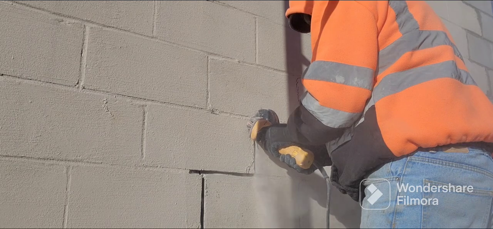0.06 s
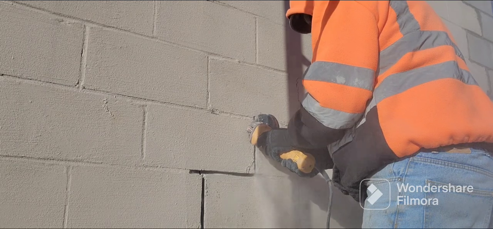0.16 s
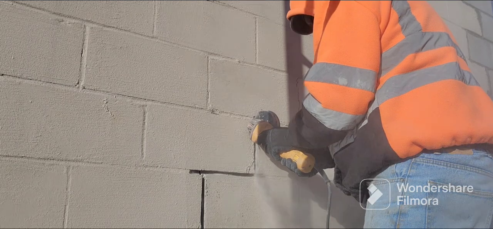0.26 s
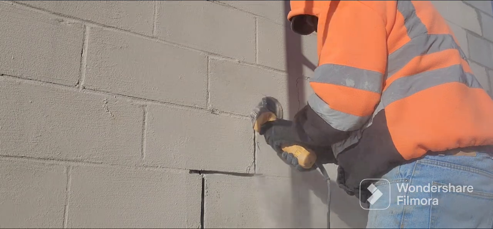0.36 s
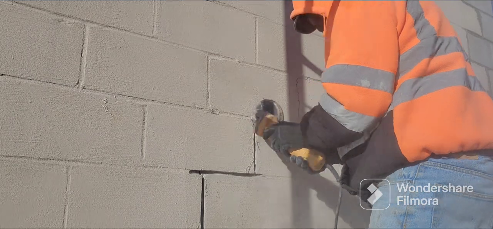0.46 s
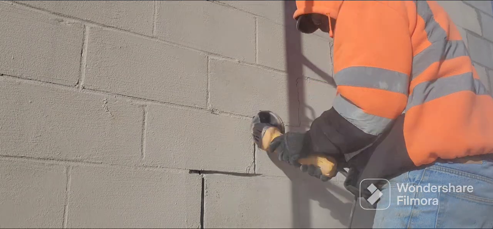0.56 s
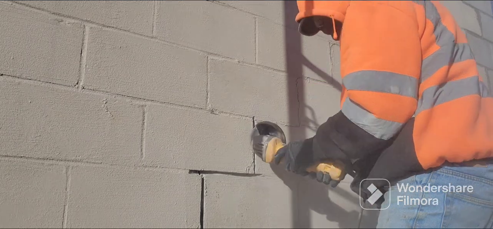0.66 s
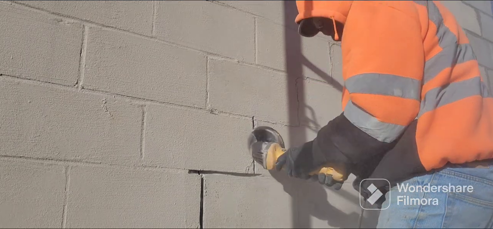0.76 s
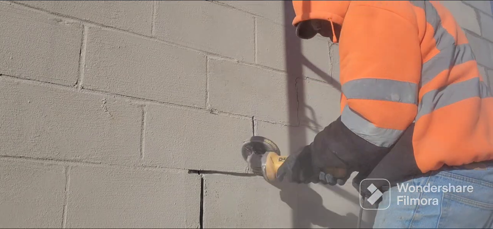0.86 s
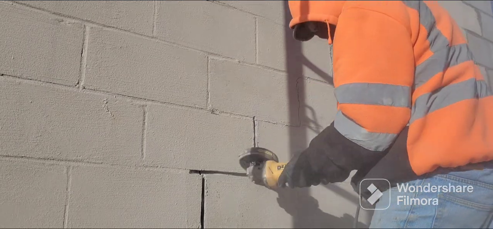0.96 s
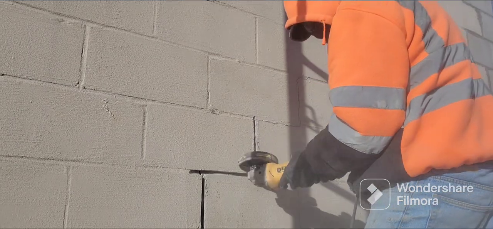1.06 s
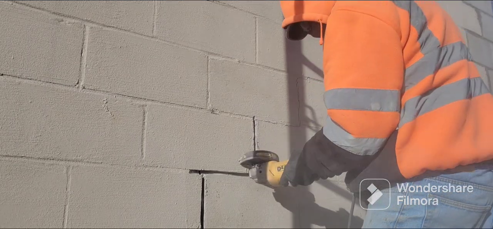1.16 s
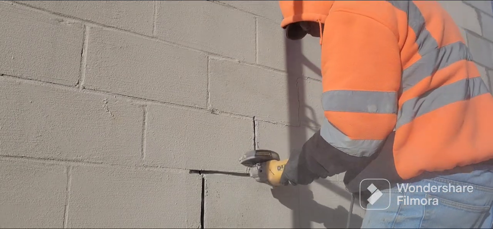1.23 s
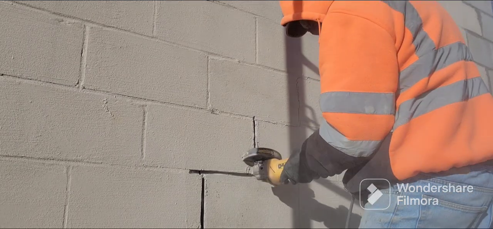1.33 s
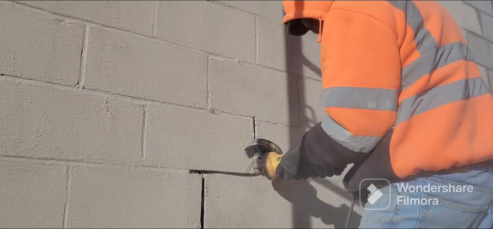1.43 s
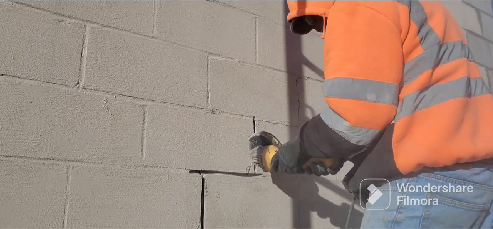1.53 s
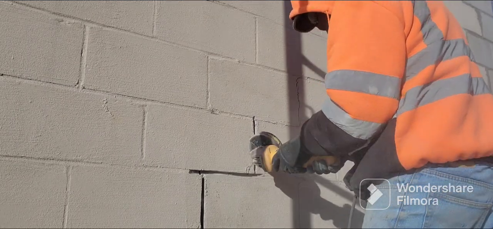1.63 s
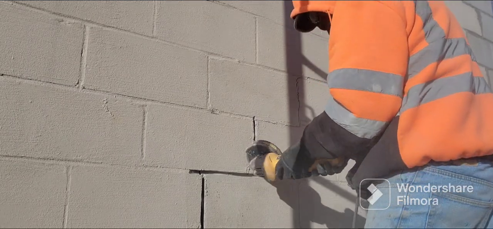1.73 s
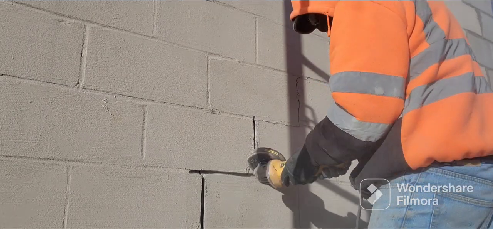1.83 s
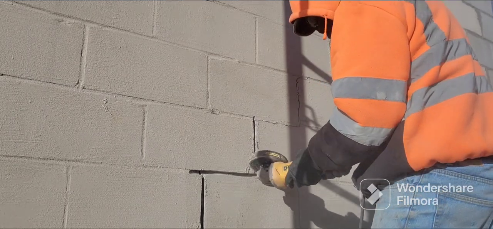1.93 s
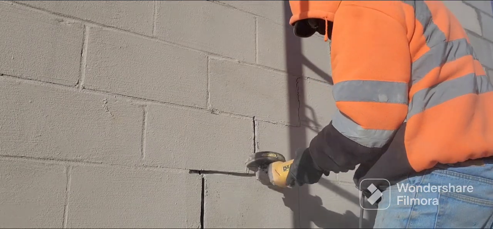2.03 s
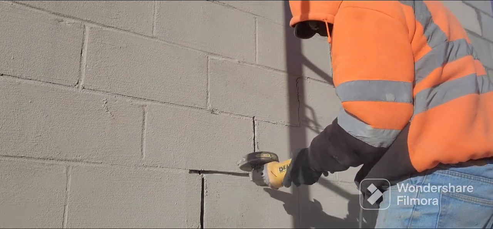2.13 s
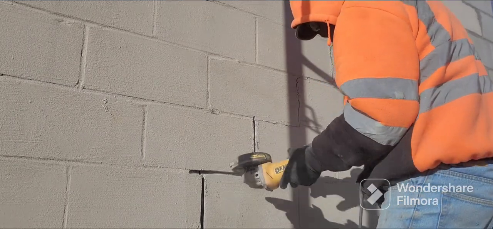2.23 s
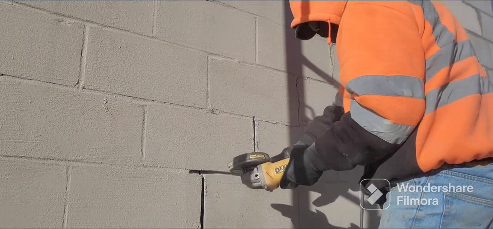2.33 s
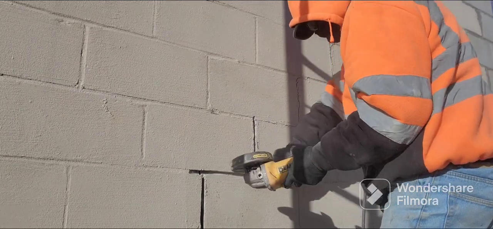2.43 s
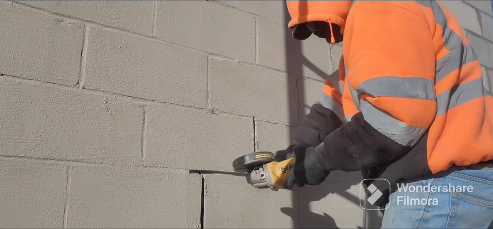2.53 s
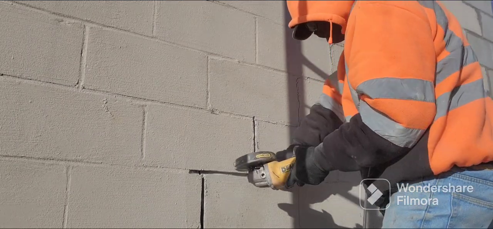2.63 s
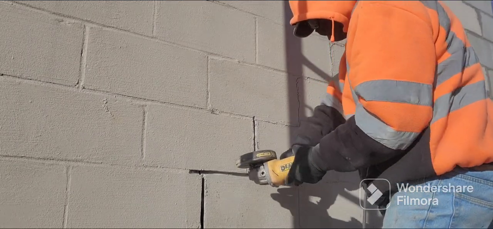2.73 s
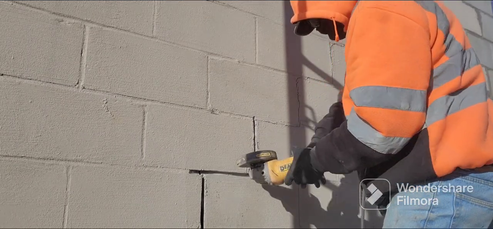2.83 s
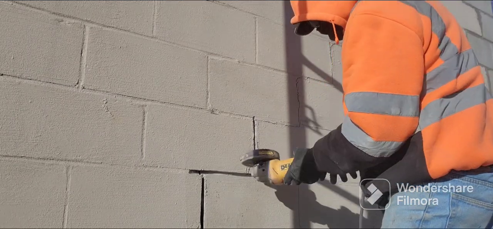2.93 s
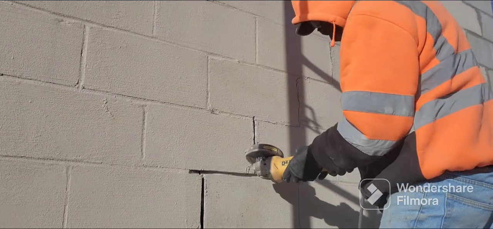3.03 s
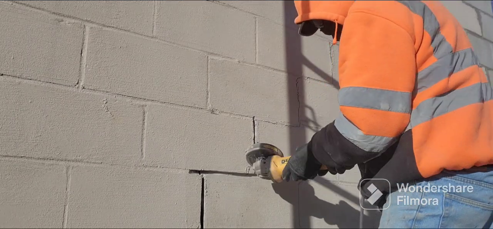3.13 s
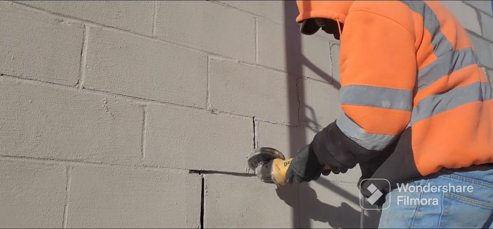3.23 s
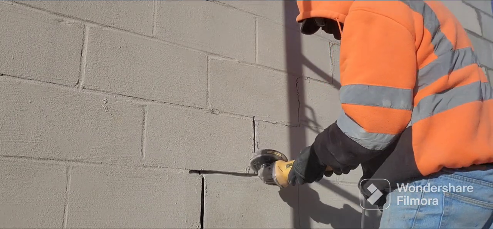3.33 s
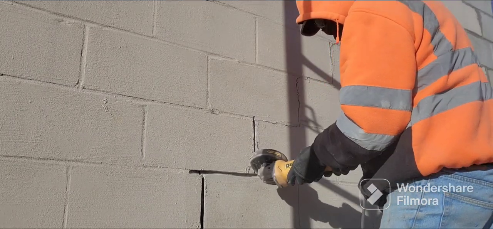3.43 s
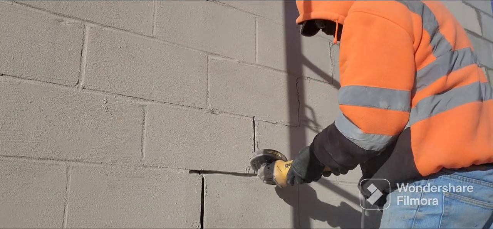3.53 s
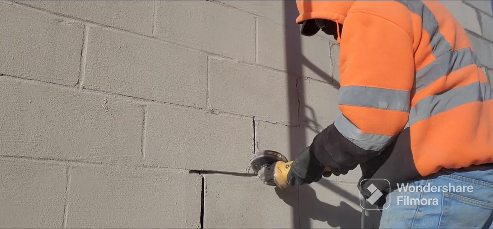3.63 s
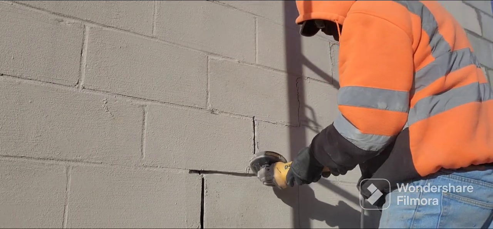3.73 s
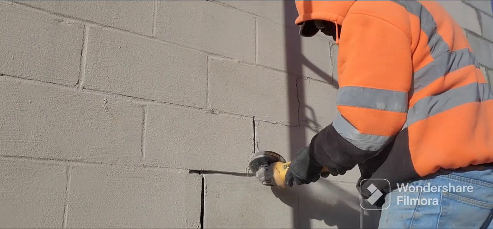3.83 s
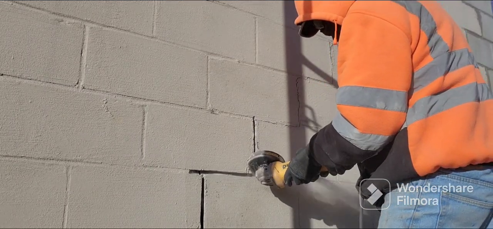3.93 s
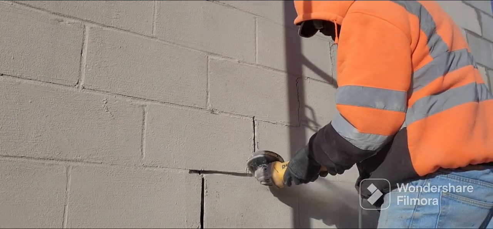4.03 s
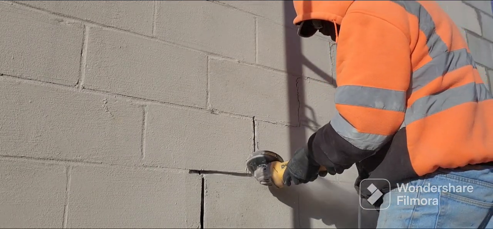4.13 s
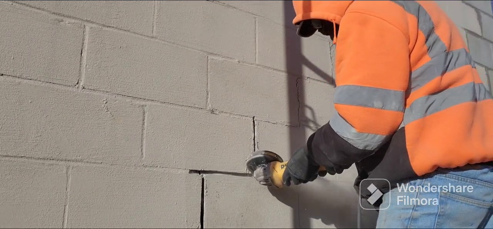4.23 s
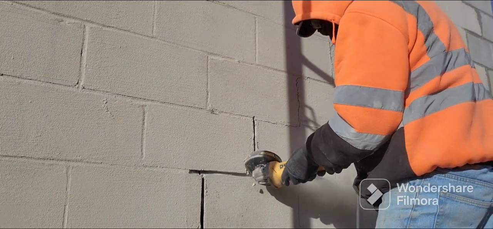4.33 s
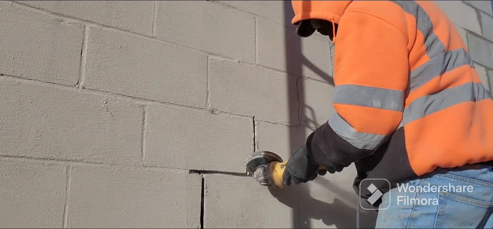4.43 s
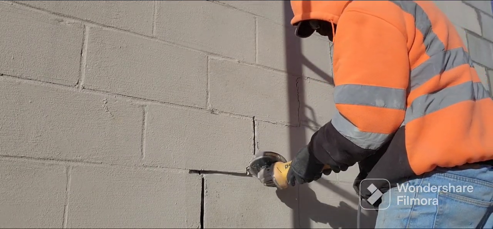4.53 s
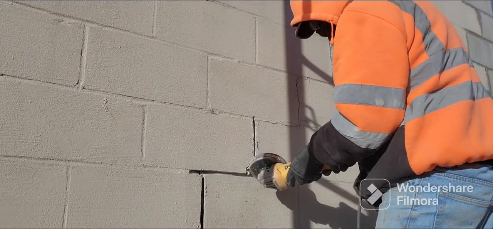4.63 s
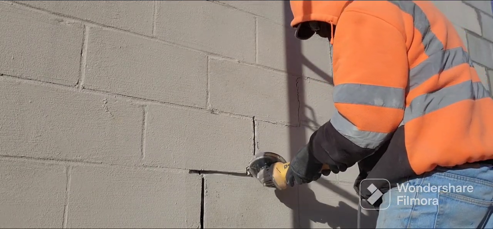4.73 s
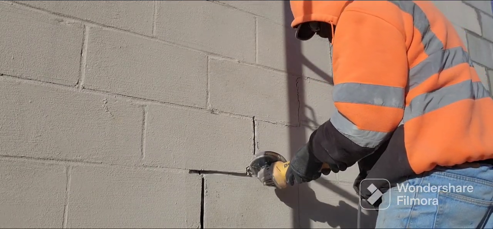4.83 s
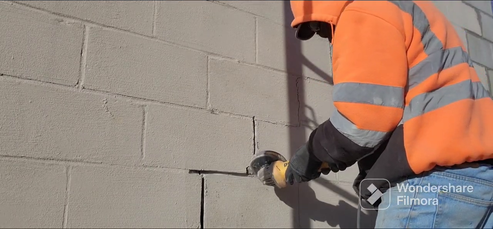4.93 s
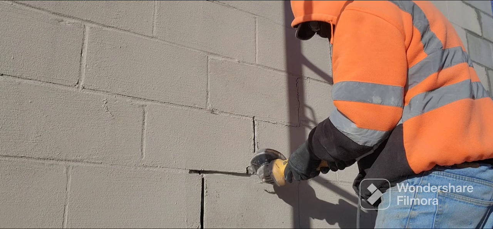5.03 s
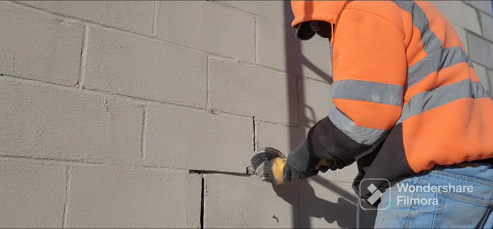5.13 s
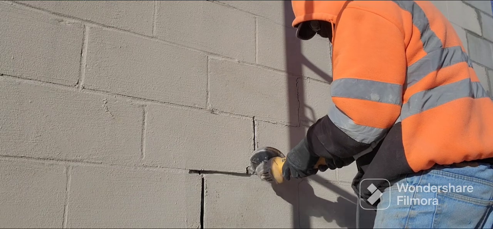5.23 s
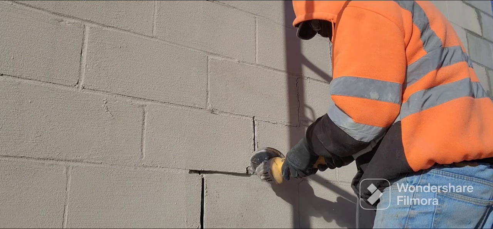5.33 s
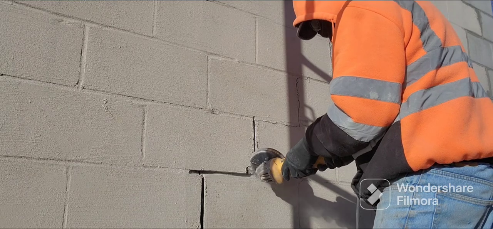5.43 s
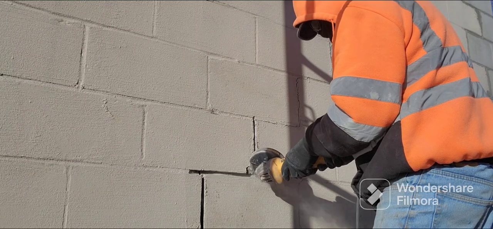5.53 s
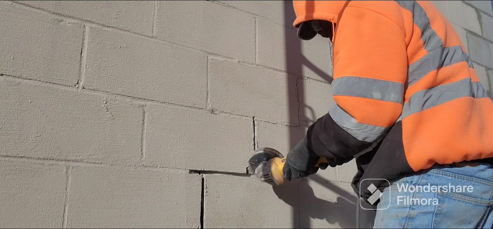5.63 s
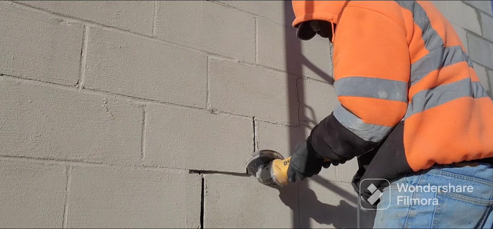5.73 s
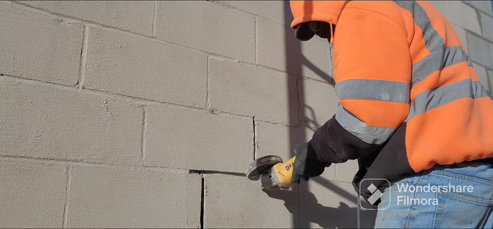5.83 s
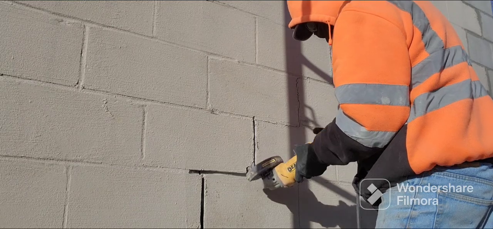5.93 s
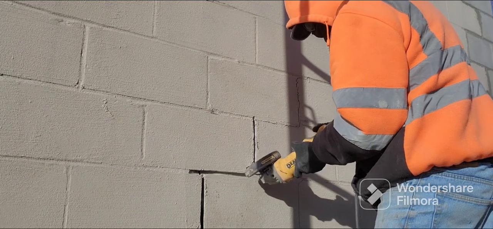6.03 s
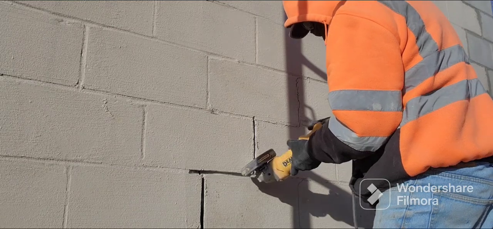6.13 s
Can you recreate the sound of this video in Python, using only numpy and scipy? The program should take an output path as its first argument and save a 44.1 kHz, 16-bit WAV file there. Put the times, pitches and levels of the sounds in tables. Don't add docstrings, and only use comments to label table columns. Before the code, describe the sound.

Outdoors beside a block wall, an angle grinder runs continuously a couple of metres from a phone with slightly wide stereo. From 0 to 0.5 s the disc is buried in mortar: a labouring, sagging motor and a coarse scrape fluttering with each turn. Around 0.5 s it snags, rattles and comes free with metallic pings; the scrape drops sharply and the motor climbs for about two seconds, a very high electric whine emerging over rushing air. From about 1.9 to 3.7 s the free disc sings in wavering, piercing whistles near 5 kHz, with small gritty grabs. At 3.9 to 4.55 s a second cut rasps loudly and pulls the speed down; it recovers with faint singing. A shallower cut at 5.3 to 5.7 s buzzes and rattles, then a ring near 5.95 s and renewed whistle to the end. Low distant rumble persists throughout.

```python
import sys
import numpy as np
from scipy import signal
from scipy.fft import rfft, irfft
from scipy.io import wavfile
from scipy.ndimage import uniform_filter1d, map_coordinates

SR = 44100
rng = np.random.default_rng(int(sys.argv[2]) if len(sys.argv) > 2 else 0)


def ratio_of_db(decibels):
    return 10 ** (np.asarray(decibels, float) / 20)


def int16_out(signal):
    q = np.round(np.clip(np.atleast_2d(signal).T, -1, 1) * 32767)
    wavfile.write(sys.argv[1], SR, q.astype(np.int16))


N = 271656
TIME = np.arange(N) / SR
FREQ = np.maximum(np.fft.rfftfreq(N, 1 / SR), 1)
SIDES = np.array([[.5], [-.5]])
FREE_HZ = 165

# time in seconds, disc turns in Hz.
SPIN = [(0, 143.8), (.36, 139.8), (.51, 121), (.8, 140.5), (1.2, 150.3), (1.6, 156.7), (2.1, 163.3),
        (2.4, 165.7), (3.15, 168), (3.94, 169.8), (4.25, 161), (4.55, 154), (4.85, 158.5), (5.28, 162.9),
        (5.6, 163.7), (5.73, 161.5), (5.95, 163), (6.16, 164.2)]
# start in seconds, length in seconds, depth 0 to 1.
CUTS = [
    (-.1, .59, 1),
    (3.93, .62, .8),
    (5.29, .42, .6),
]
# time in seconds, guard turned to the phone -1 to 1,
# vent tilted up -1 to 1, body out of the way in dB.
GRIP = [(0, 0.86, -0.57, 0), (.4, 0.53, -0.018, 0.6), (.55, -0.051, -0.16, -1.5), (.75, -0.12, -0.7, -0.2),
        (1.1, 0.52, 0.055, 0.9), (1.7, 0.2, -1, 0.8), (2.1, 0.93, -.3, -1.1), (2.35, 0.55, .8, 1),
        (2.65, 0.84, 0.23, 0.4), (2.95, 0.98, 0.72, 0.4), (3.2, 0.14, -.6, -0.5), (3.7, -0.85, 0.075, 0.8),
        (4.3, -0.85, 0.99, -1.2), (4.7, -0.48, 0.15, 1), (5.2, -0.63, 0.32, 0.8), (5.8, -0.34, 0.46, 0),
        (5.95, 0.54, -.3, 0), (6.16, .7, 0.46, -0.8)]
# time in seconds, effort in dB.
EFFORT = [(0, -1.5), (.38, 2.2), (.49, 3), (.525, -12), (.75, -8), (1.1, -3), (1.75, -0.5), (2.25, -0.5),
          (3.1, 1), (3.25, 0), (3.85, 0), (4, 4.5), (4.53, 1), (4.61, -2.5), (5.25, -0.5), (5.35, 1.5),
          (5.95, -.5), (6.16, 1)]
# start in seconds, length in seconds, lift in dB.
GRABS = [(1.08, 0.055, -0.5), (1.32, .05, -0.5), (1.75, .1, -0.5), (2.1, .08, 2), (2.62, .07, 1.5),
         (2.99, .04, 0.5), (3.1, 0.058, 0), (4.04, 0.073, 1.2), (4.34, 0.043, 2), (4.51, .03, 2.5),
         (4.74, .04, -1), (5.66, .05, 3)]
# start in seconds, length in seconds, lift in dB.
SNAGS = [(.455, .04, 8), (.7, .05, 2.2), (3.066, 0.022, 1), (3.748, 0.025, 1.5), (4.38, 0.026, 2.2),
         (5.175, 0.044, 2.5), (5.7, 0.041, 2.2)]
# frequency in Hz, density in dB per Hz.
YARD_COLOUR = [(19, -31), (33, -2.5), (54, 1.5), (130, -5.5), (161, -6.5), (190, -5), (236, -6.5),
               (290, -2), (379, 0), (593, -12), (700, -6.5), (910, -25), (1540, -120)]
# frequency in Hz, density in dB per Hz.
AIR_COLOUR = [(260, -50), (450, -19.5), (593, -25.5), (746, -15.5), (837, -9.5), (984, -10.5), (1060, -9),
              (1370, -5.5), (1920, 2), (2410, -3.5), (2860, -3), (3120, -9.5), (3470, -11.5), (3810, -9.5),
              (4400, -19.5), (5720, -47), (9680, -120)]
# frequency in Hz, density in dB per Hz.
RIM_COLOUR = [(1880, -31.0), (3200, -13), (3830, -9), (4290, -12.5), (5100, 1), (5520, -8.5), (5980, -4),
              (6830, -6.5), (7600, 0), (8800, -12.0), (9790, -13.5), (10700, -12), (12800, -7.0),
              (15700, -8.5), (17000, -11)]
# frequency in Hz, width in Hz, gain in dB.
AIR_MODES = [(1073, 23, 3.5), (1780, 31, 0), (2177, 180, 3), (2930, 56, 3), (3700, 57, 3.5), (3927, 49, 9)]
# frequency in Hz, width in Hz, gain in dB.
RIM_MODES = [(4010, 45, 2.2), (5250, 190, 1.5), (5760, 116, 3.6), (6700, 87, 0.73), (7760, 180, 3.7),
             (12050, 650, 5.7)]
# start in seconds, length in seconds, multiple of the turn, level in dB.
SHAKE = [(1.6, 5, 1, -51.5), (1.2, 5, 2, -51), (.95, .25, 2, -45), (0, .5, 1, -52), (.1, .13, 1, -41),
         (.36, .14, 1, -39.5), (4.15, .33, 1, -44), (.2, .18, 2, -44), (4.25, .22, 2, -45.5),
         (.1, .15, 10, -42), (.28, .14, 10, -35), (.44, .05, 10, -30), (5.32, .38, 10, -31),
         (5.29, .1, 31, -26), (5.43, .15, 31, -34), (5.62, .06, 31, -27), (5.29, .06, 30, -30),
         (5.4, .08, 28, -36), (3.95, .1, 30, -28), (4.05, .07, 31, -27), (4.33, .07, 31, -28),
         (4.5, .04, 31, -29), (4.5, .04, 32, -29)]
# start in seconds, length in seconds, level in dB.
SING = [(1.46, .25, -36.5), (1.9, 2.03, -38), (1.89, 0.1, -28), (2, 0.23, -24.5), (2.31, 0.11, -25),
        (2.48, 0.14, -28), (2.8, 0.12, -27.5), (2.97, 0.065, -23), (3.1, .1, -26), (3.17, .22, -22.5),
        (3.4, .3, -28.5), (3.7, 0.27, -37), (4.8, .17, -39), (4.99, .16, -32), (5.13, 0.14, -28),
        (5.8, .12, -33), (5.9, .12, -28.5), (6.02, 0.22, -25.5)]
# start in seconds, length in seconds, level in dB.
SIDE_TONE = [(2.28, 0.12, -33), (2.86, .18, -35.5), (3.16, 0.26, -31), (3.5, .4, -39)]
# start in seconds, length in seconds, level in dB.
PARTNER = [(1.95, 0.16, -36), (2.22, .14, -31), (2.66, .1, -30), (2.76, 0.12, -34), (3, .2, -32),
           (3.4, .2, -35), (3.6, .34, -28.5), (4.72, 0.3, -34.5), (4.97, 0.28, -30), (5.82, 0.16, -33)]
# start in seconds, frequency in Hz, level in dB, t60 in
# seconds.
PINGS = [(.515, 3925, -27.5, .6), (.7, 1850, -24, .45), (.53, 5850, -37, .5), (.2, 3680, -35, 1.2),
         (5.95, 5030, -23, .7)]
# frequency in Hz, likeness 0 to 1.
ALIKE = [(60, .88), (1100, .96), (2000, .82), (2900, .87), (3450, .45), (4150, .4), (4700, .72), (5200, .7),
         (5500, .35), (5900, .62), (7000, .36), (7850, .68), (8700, .24), (12000, .35)]
# frequency in Hz, left minus right in dB.
LEAN = [(60, .5), (1300, 2), (2000, 7), (2600, 0), (3000, 1.5), (4150, -4), (4700, 4), (5500, -.5),
        (6500, 6.5), (8200, .5), (9500, 2), (11000, 0), (12050, -8), (13400, 2.5)]
# frequency in Hz, lead of the left in radians.
LEAD = [(60, 0), (1400, .5), (1900, .6), (2250, -.5), (3200, 0), (4050, 1), (4350, 2.6), (4700, 2),
        (5300, .7), (5600, 2), (6900, 1), (8200, .4), (9000, 1.5), (12000, 2.3)]


def curve(table):
    s, *columns = np.transpose(table)
    return [np.interp(TIME, s, c) for c in columns]


def over_hz(table, at_hz=FREQ):
    hz, value = np.transpose(table)
    return np.interp(np.log(at_hz), np.log(hz), value)


def band(x, lo_hz, hi_hz):
    edge = (hi_hz - lo_hz) / 10
    gain = (np.tanh((FREQ - lo_hz) / edge) - np.tanh((FREQ - hi_hz) / edge)) / 2
    return irfft(rfft(x) * gain, N)


def walk(rate):
    k = int(SR / rate)
    steps = np.repeat(rng.standard_normal(N // k + 1), k)
    return 1.254 * uniform_filter1d(uniform_filter1d(steps, k), k)[:N]


def held(s, length, attack, release, t=TIME):
    return np.clip(np.minimum((t - s) / attack, 1 + (s + length - t) / release), 0, 1)


def phrases(rows):
    swell_s, fade_s = .03, .045
    t = TIME[::32]
    levels = [ratio_of_db(db) * held(s - swell_s / 2, length, swell_s, fade_s, t) for s, length, db in rows]
    return np.interp(TIME, t, 20 * np.log10(np.max(levels, 0) + 1e-5))


def bumps(rows):
    t = TIME[::32]
    return np.interp(TIME, t, sum(db * held(s, length, 0.011, 0.012, t) for s, length, db in rows))


def speed_db(spin_hz):
    return 20 * np.log10(spin_hz / FREE_HZ)


def at_ports(noise, colour, modes, lo_hz, hi_hz):
    direct, *scattered = rfft(noise)
    alike, lead, lean = over_hz(ALIKE), over_hz(LEAD), ratio_of_db(SIDES * over_hz(LEAN))
    both = np.sqrt(alike) * direct * np.exp(1j * SIDES * lead)
    both = both + np.sqrt(1 - alike) * np.array(scattered)
    together = np.sqrt(np.sum(lean ** 2, 0) + 2 * alike * np.cos(lead))
    modes_db = sum(db / (1 + (2 * (FREQ - hz) / width) ** 2) for hz, width, db in modes)
    both = both * lean * ratio_of_db(over_hz(colour) + modes_db) / together
    inside = (FREQ > lo_hz) & (FREQ < hi_hz)
    return irfft(both, N) * N / np.sqrt(2 * np.sum(np.abs(both.mean(0)[inside]) ** 2))


def swell(x, lo_hz, hi_hz, db, flicker_db):
    return (ratio_of_db(db - np.median(db) + flicker_db * walk(18)) - 1) * band(x, lo_hz, hi_hz)


def tone(hz, db):
    lead, lean_db = (np.repeat(over_hz(table, hz[::64]), 64)[:len(hz)] for table in (LEAD, LEAN))
    lean = ratio_of_db(SIDES * lean_db)
    together = np.sqrt(np.sum(lean ** 2, 0) + 2 * np.cos(lead)) / 2
    phase = 2 * np.pi * np.cumsum(hz) / SR + SIDES * lead
    return np.sqrt(2) * ratio_of_db(db) * lean / together * np.sin(phase)


def site(spin_hz, depth):
    hum_db = 0.4 * depth + 0.69 * speed_db(spin_hz)
    yard = at_ports(rng.standard_normal((3, N)), YARD_COLOUR, [], 33, 84)
    yard = yard + swell(yard, 120, 770, hum_db, 1.46)
    return yard * (spin_hz / FREE_HZ) ** .7 * ratio_of_db(-47 + 1.16 * walk(6))


def air(spin_hz, depth):
    turn, tilt, open_db = curve(GRIP)
    low_vent_db = -2.5 * tilt
    rush = at_ports(rng.standard_normal((3, N)), AIR_COLOUR, AIR_MODES, 1470, 2017)
    guard = swell(rush, 2620, 3010, 5 * turn - low_vent_db, 1.35)
    vent = swell(rush, 2043, 2730, 5 * tilt, 0.81)
    housing = swell(rush, 815, 1220, 4 * turn + 1.6 * depth - low_vent_db, 0.66)
    rush = rush + guard + vent + housing
    rush = rush + swell(rush, 1890, 2250, -1.5 * turn, 1.16)
    db = -25 + 2.8 * speed_db(spin_hz) + 1.5 * depth + low_vent_db + open_db + bumps(SNAGS)
    return rush * ratio_of_db(db + 0.57 * walk(25.035) + 0.58 * walk(9))


def commutator(spin_hz, depth):
    drowned = np.clip((depth - .6) / .2, 0, 1) + np.clip((1.15 - TIME) / .2, 0, 1)
    db = -38.3 - 35 * drowned + 2.5 * walk(20) + 1.2 * walk(6)
    return tone(80 * spin_hz + 5 * walk(60), db)


def shaking(spin_hz):
    out = 0
    for k in sorted({row[2] for row in SHAKE}):
        rows = [(s, length, db) for s, length, multiple, db in SHAKE if multiple == k]
        out = out + tone(k * spin_hz + 2.5 * walk(30), phrases(rows))
    return out


def singing(spin_hz):
    hz = 4657 + 4.3 * (spin_hz - 163.7) + 5 * walk(50)
    main = tone(hz, phrases(SING) + 1.5 * walk(30))
    side = tone(hz + spin_hz, phrases(SIDE_TONE) + 3 * walk(20))
    partner = tone(hz + 2 * spin_hz + 4 * walk(50), phrases(PARTNER) + 2 * walk(30))
    return main + side + partner


def pings():
    out = np.zeros((2, N))
    for s, hz, db, t60 in PINGS:
        rings = slice(int(s * SR), int((s + t60) * SR))
        age = TIME[rings] - s
        ring = tone(hz + 8 * walk(60)[rings], db - 60 * age / t60 + 1.5 * walk(40)[rings])
        out[:, rings] += np.minimum(age / .015, 1) * ring
    return out


def rim(turns, depth, size=288):
    repeat_free, repeat_cut = .13, .5
    keep = repeat_free + (repeat_cut - repeat_free) * np.minimum(2 * depth, 1)
    grit = rng.standard_normal((int(turns[-1]) + 2, 3, size))
    for k, share in enumerate(keep[np.searchsorted(turns, np.arange(1, len(grit) - 1))]):
        grit[k + 1] = share * grit[k] + np.sqrt(1 - share ** 2) * grit[k + 1]
    scrape = np.array([map_coordinates(grit[:, c].ravel(), [turns * size], order=3) for c in range(3)])
    scrape *= 1 + 0.24 * keep * np.cos(2 * np.pi * turns)
    scrape = at_ports(scrape, RIM_COLOUR, RIM_MODES, 5420, 6990)
    buried = depth ** 4
    disc = swell(scrape, 4620, 5500, -2.5 * curve(GRIP)[0] + 0.5 * depth - 2 * buried, 1.0)
    hub = swell(scrape, 6300, 8700, -0.5 * depth + buried, 1.0)
    top = swell(scrape, 9000, 24000, 0.2 * depth, 0.78)
    scrape = scrape + disc + hub + top
    spread = ratio_of_db(6 * buried) - 1
    scrape = scrape + spread * (band(scrape, 7070, 7200) + band(scrape, 8340, 8640))
    return scrape * ratio_of_db(-28.5 + curve(EFFORT)[0] + bumps(GRABS) + 0.39 * walk(30) + 0.84 * walk(9))


def scene():
    spin_hz = uniform_filter1d(curve(SPIN)[0], int(.08 * SR))
    depth = sum(d * held(s, length, .04, .025) for s, length, d in CUTS)
    background = site(spin_hz, depth) + air(spin_hz, depth)
    tones = commutator(spin_hz, depth) + shaking(spin_hz) + singing(spin_hz) + pings()
    return background + tones + rim(np.cumsum(spin_hz) / SR, depth)


def low_pass(x):
    return signal.sosfilt(signal.butter(12, 16940, fs=SR, output="sos"), x)


def record(dry):
    top = 1 / (1 + np.exp(np.clip((FREQ - 15760) / 14, -30, 30)))
    rounded = np.tanh(0.79 * dry) / 0.81
    mix = irfft(rfft(rounded) * top, N)
    return low_pass(mix)


dry = scene()
out = record(dry)
int16_out(out)
```